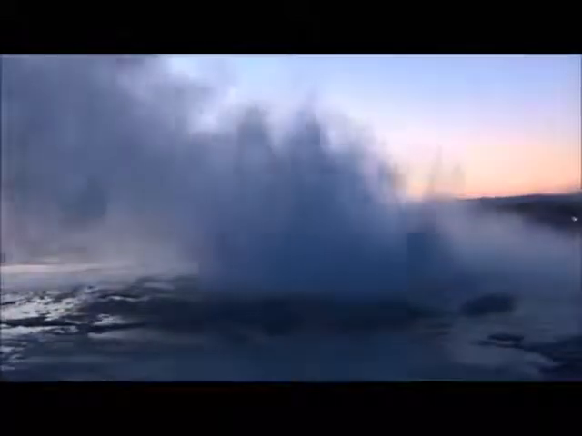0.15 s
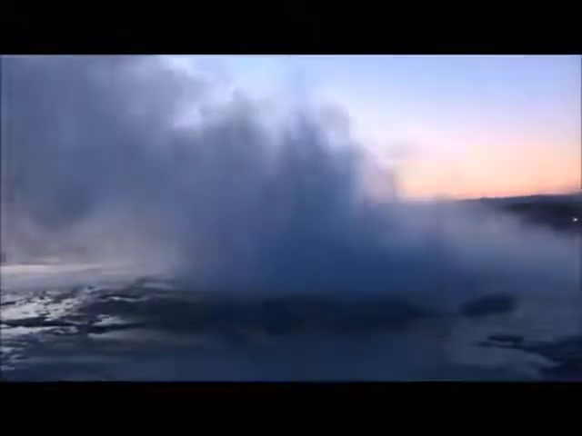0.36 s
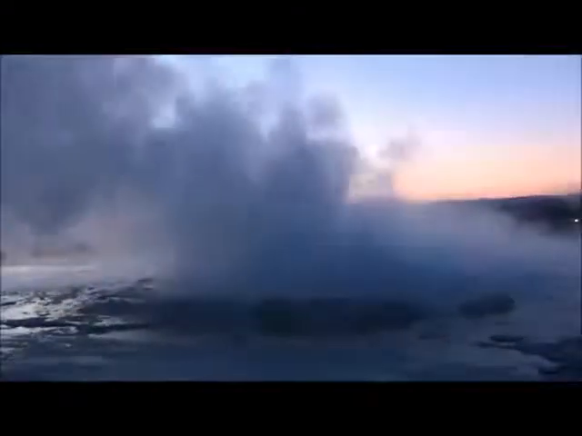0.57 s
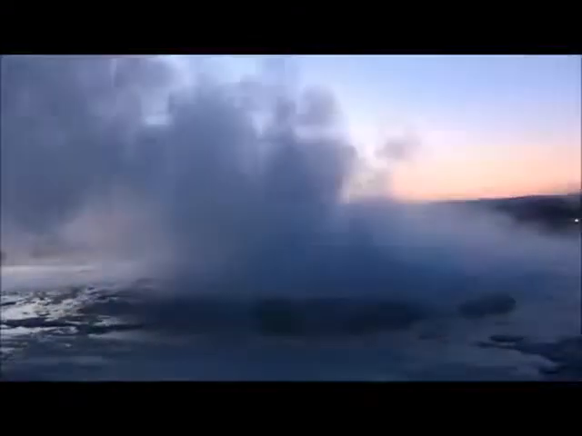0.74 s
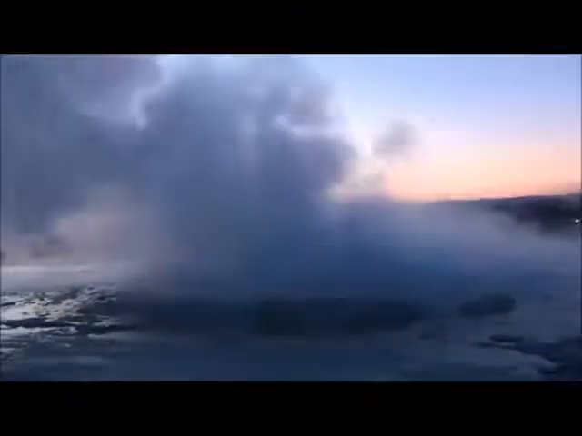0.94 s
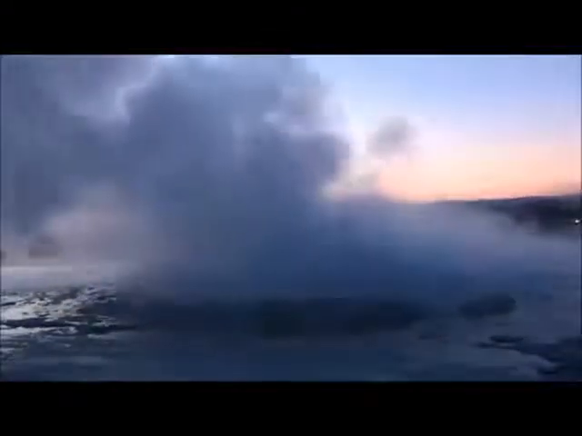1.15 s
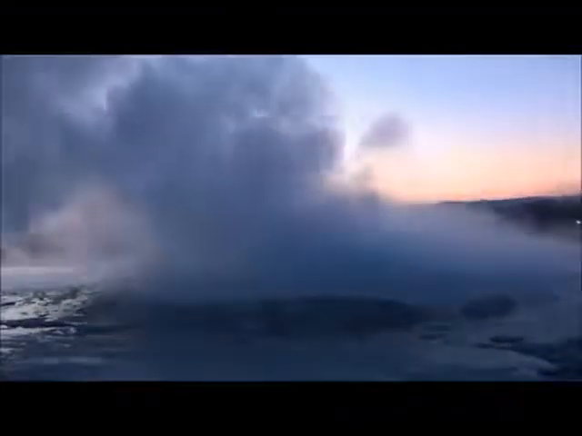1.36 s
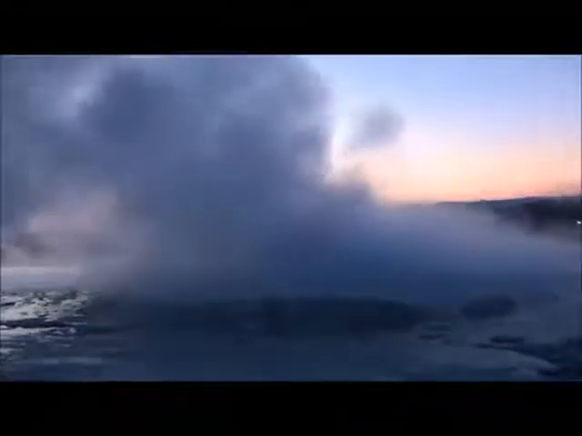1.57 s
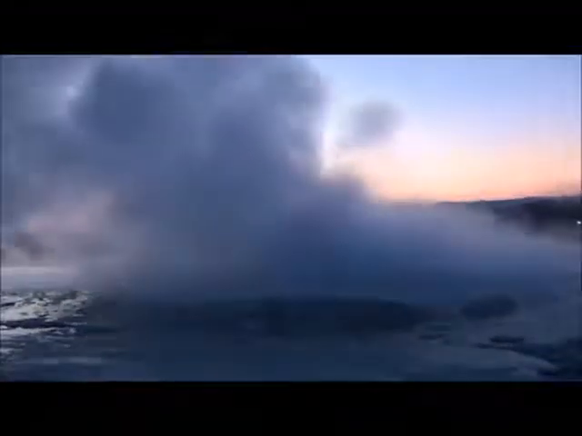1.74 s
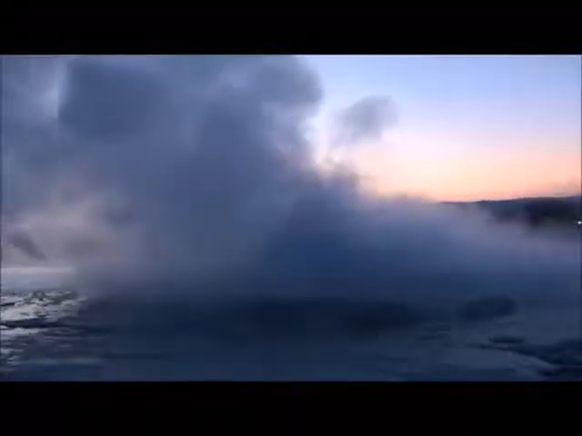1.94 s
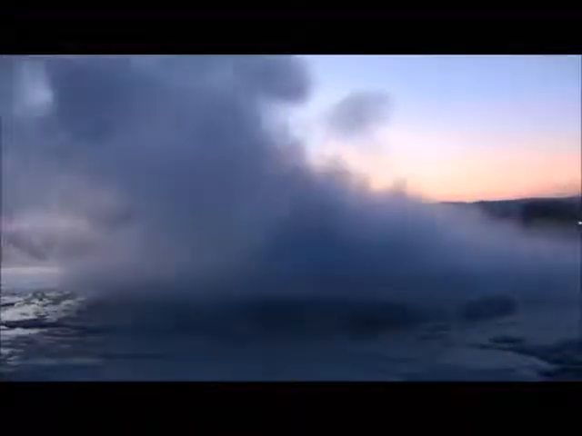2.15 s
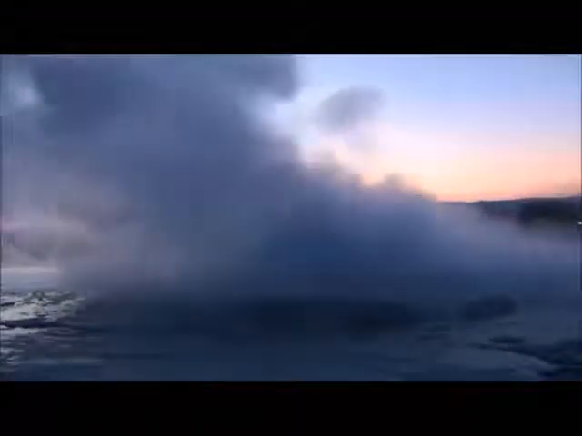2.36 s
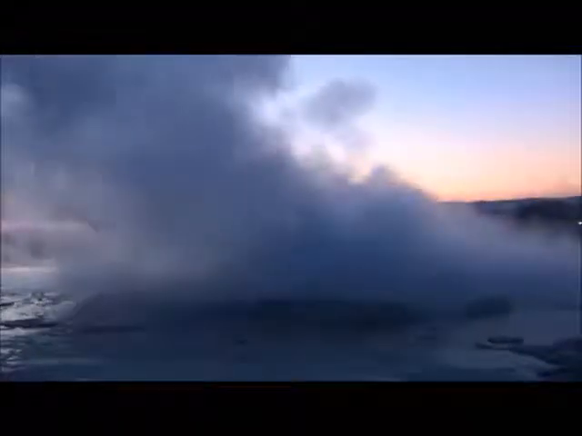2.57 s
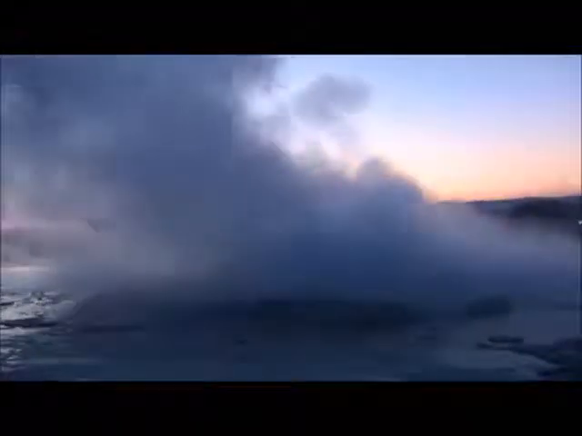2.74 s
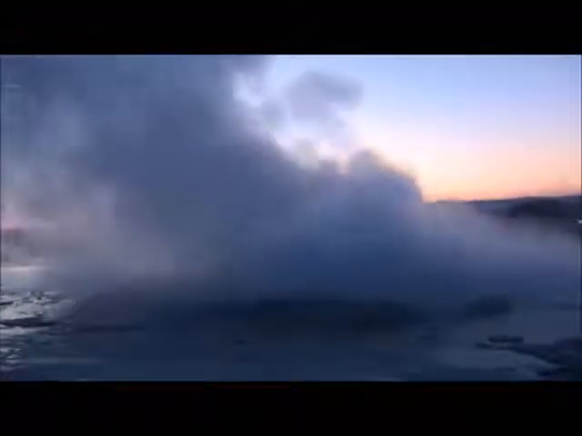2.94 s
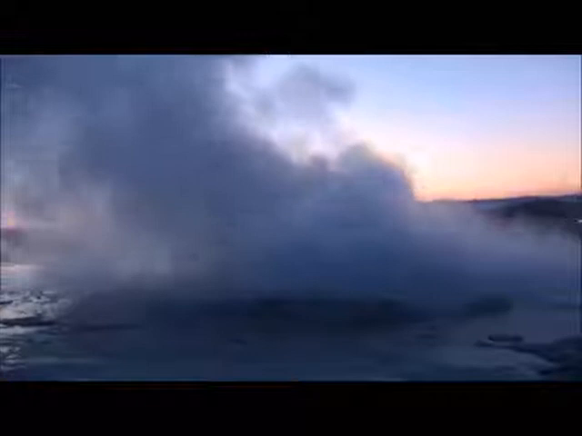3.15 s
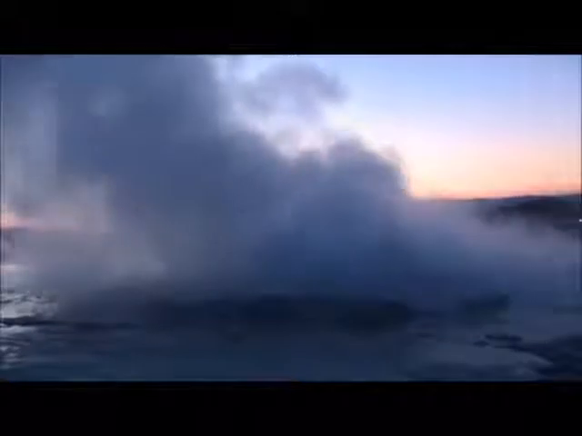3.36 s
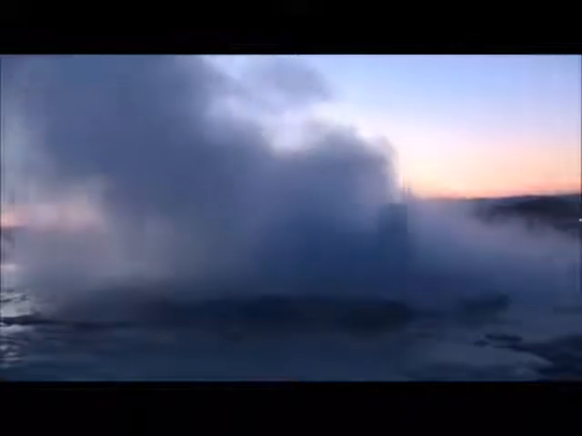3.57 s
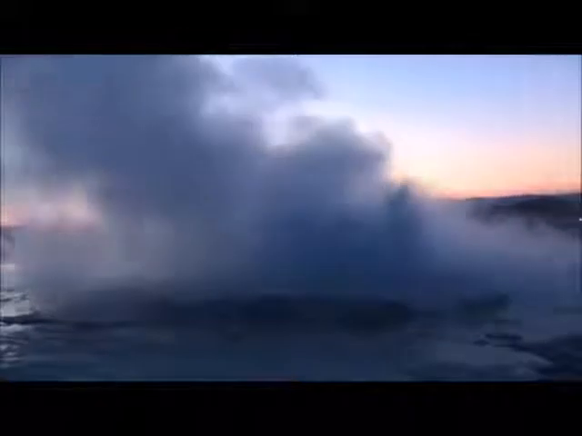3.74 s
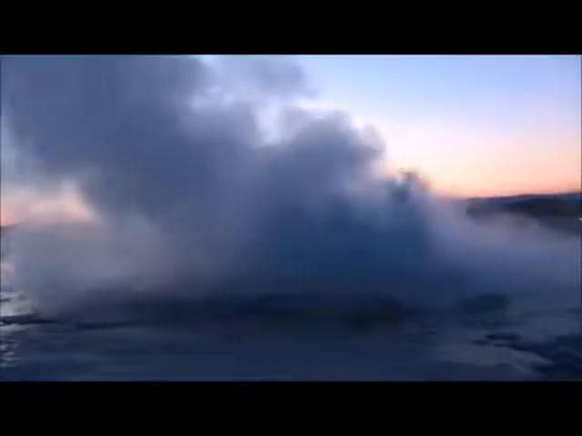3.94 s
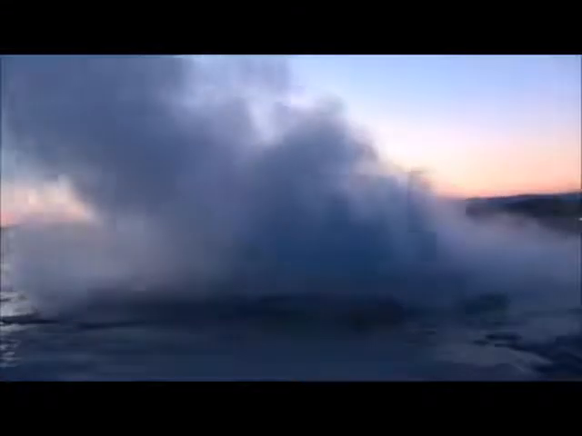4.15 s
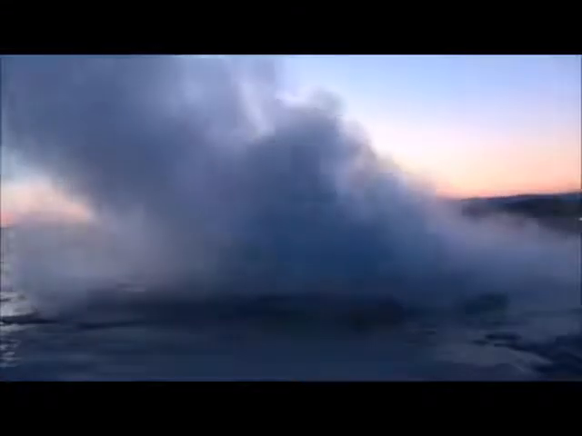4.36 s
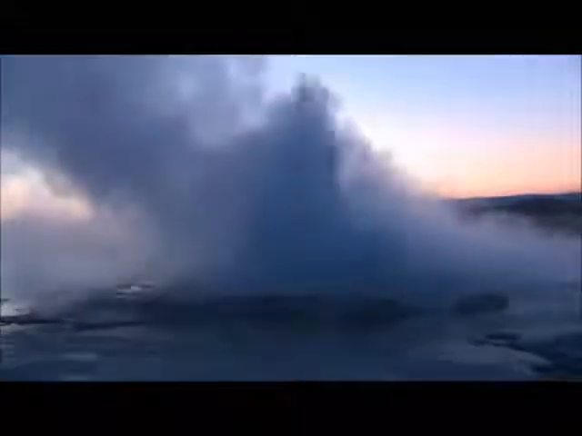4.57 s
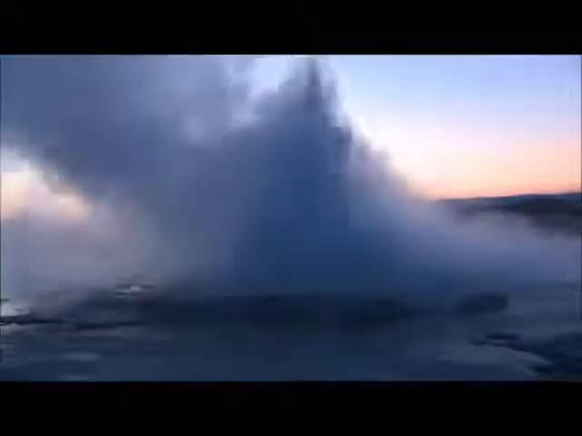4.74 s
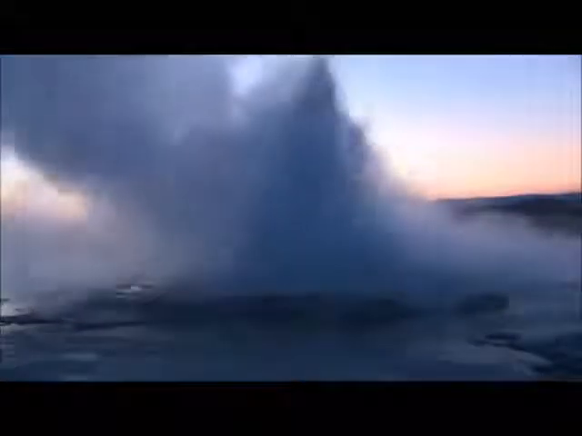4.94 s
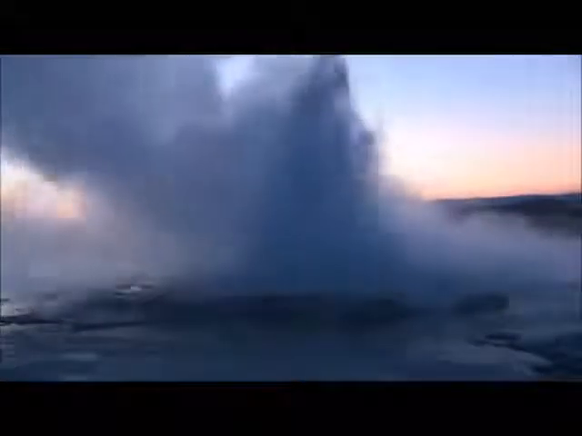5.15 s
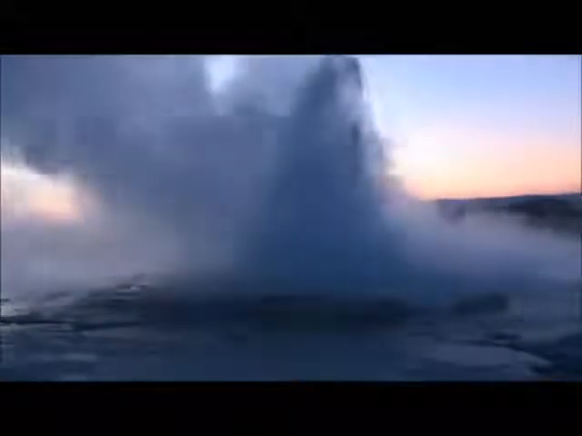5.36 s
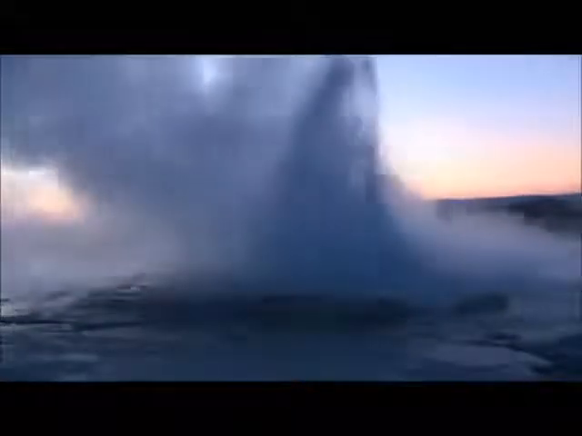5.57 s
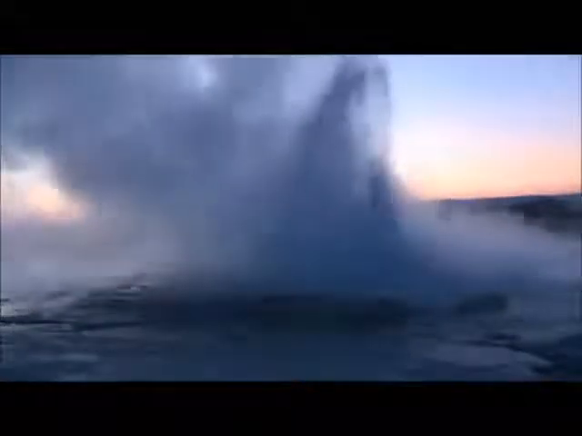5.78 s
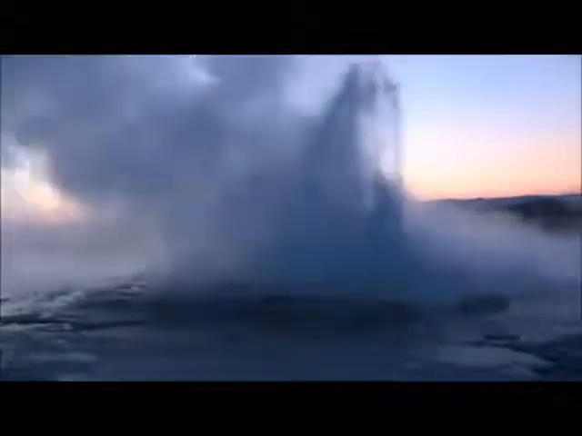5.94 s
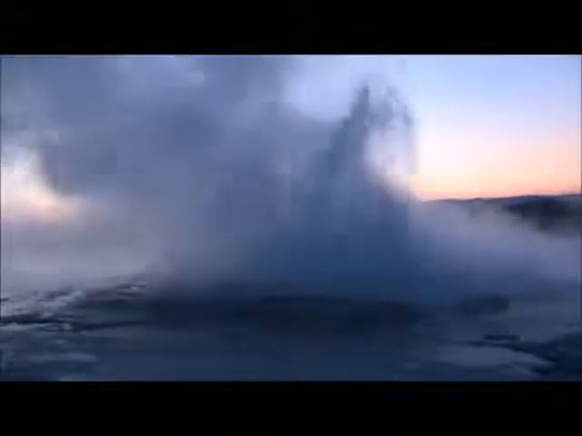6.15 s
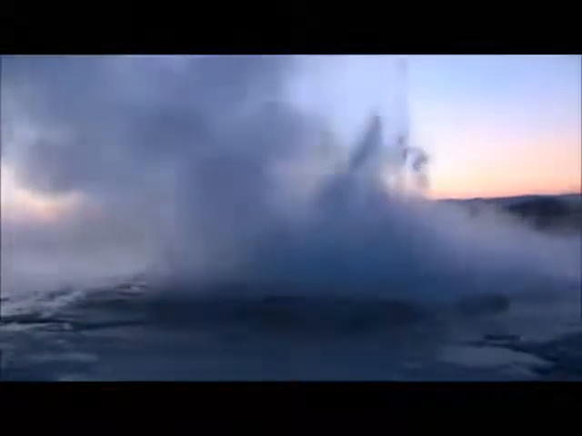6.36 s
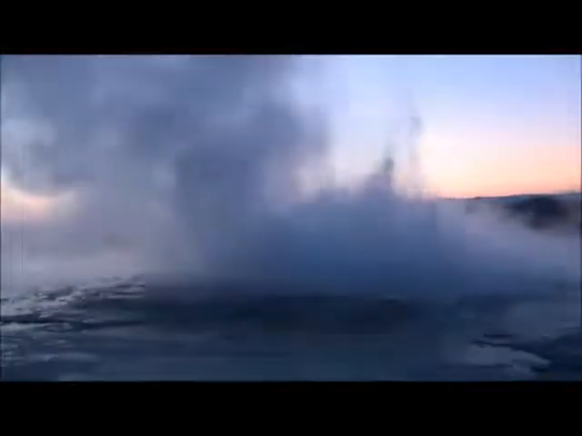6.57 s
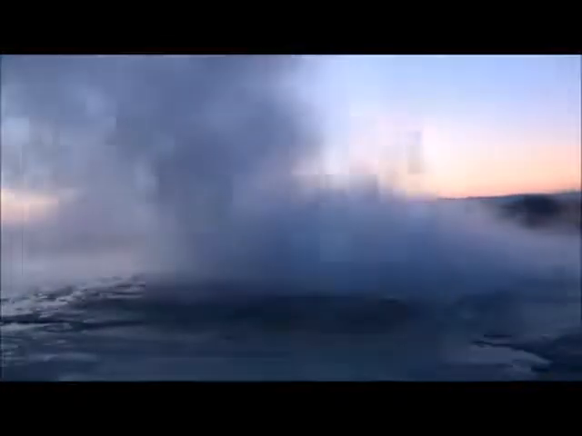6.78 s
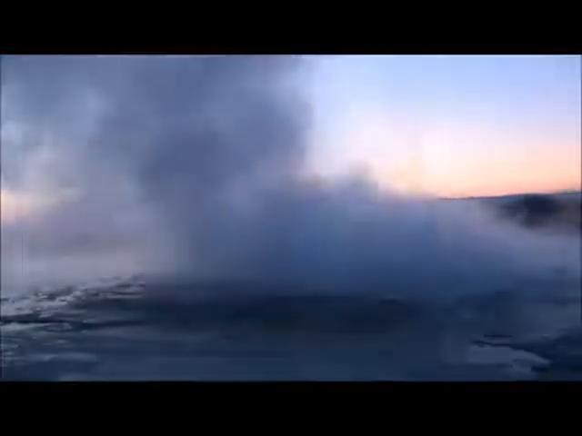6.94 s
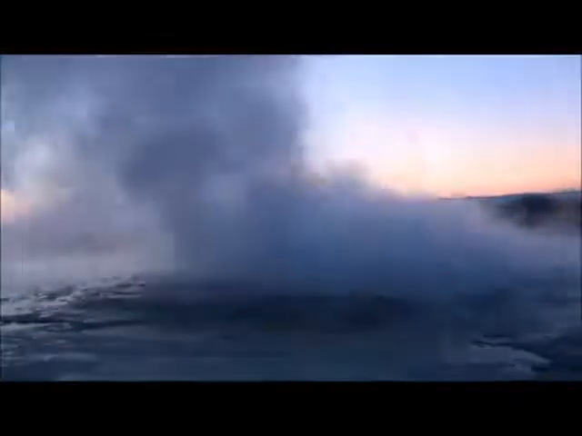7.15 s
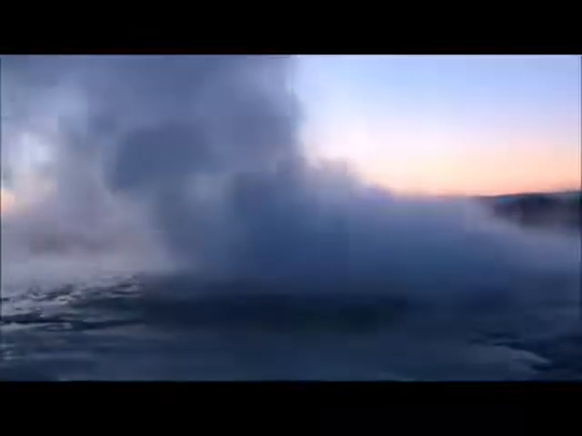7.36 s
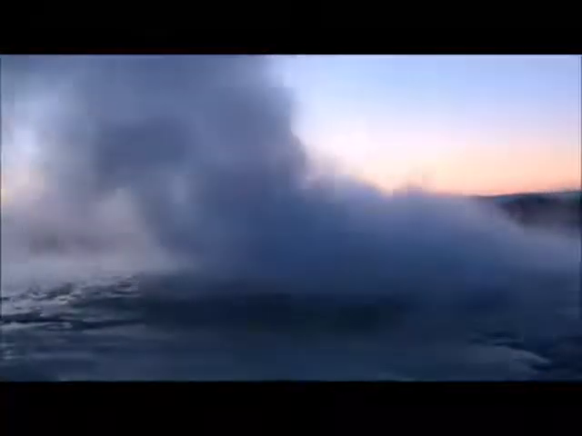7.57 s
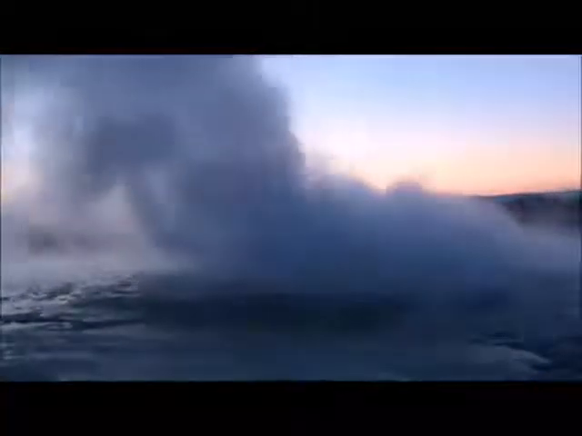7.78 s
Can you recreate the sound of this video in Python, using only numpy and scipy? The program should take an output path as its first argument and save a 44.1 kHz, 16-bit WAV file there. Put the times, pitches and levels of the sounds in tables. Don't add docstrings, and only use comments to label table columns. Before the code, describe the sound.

Broad, noisy water eruption on open wet ground: muffled steam rumble, gurgling slugs of water and countless splats and bubbles under hissing spray. It starts crisp and lively, drops in level after about a second, falls into a dark lull, then returns in uneven heaves, fullest in the second half. A small distant microphone gives an almost central image, with no echo.

```python
import sys
import numpy as np
from scipy import signal
from scipy.io import wavfile
from scipy.ndimage import uniform_filter1d

SR = 44100
rng = np.random.default_rng(int(sys.argv[2]) if len(sys.argv) > 2 else 0)


def undo_db(level):
    steps = np.asarray(level, float) / 20
    return 10 ** steps


def unload_wav(signal):
    wavfile.write(
        sys.argv[1],
        SR,
        np.round(np.clip(np.atleast_2d(signal).T, -1, 1) * 32767).astype(np.int16),
    )


N = 344421


def evened(x):
    return x / np.sqrt(np.mean(x ** 2) + 1e-20)


def smoothed(x, frames, bins):
    return evened(uniform_filter1d(uniform_filter1d(x, size=bins, axis=0), size=frames, axis=1))


def unrest(frames, bins, patchy_db=0.5, gust_db=0.09, flicker_db=0.27):
    a, b = rng.standard_normal((frames, bins, 2)).T
    patches = smoothed(a, 8, 8)
    gusts = smoothed(b, 150, 14)
    flicker = evened(uniform_filter1d(rng.standard_normal(frames), size=3))
    return patchy_db * patches + gust_db * gusts + flicker_db * flicker


def grain(hz, cycles):
    t = np.arange(-150, 151) / SR
    return np.cos(2 * np.pi * hz * t) * np.exp(-.5 * (t * hz / (0.47 * cycles)) ** 2)


def bubble(hz):
    t = np.arange(560) / SR
    ring_s, onset_s = 0.0063, 0.00091
    envelope = np.exp(-t / ring_s) * (1 - np.exp(-t / onset_s))
    return np.sin(2 * np.pi * hz * t * (1 + .5 * t)) * envelope


def shower(shape, per_s, db, spread_db, low_hz, high_hz):
    when, pitch, size, sign = rng.random((round(per_s * N / SR), 4)).T[:, :, None]
    sounds = shape(low_hz + (high_hz - low_hz) * pitch)
    sounds /= np.linalg.norm(sounds, axis=1, keepdims=True)
    sounds *= undo_db(spread_db * np.minimum(-np.log(size), 5)) * np.sign(sign - .5)
    at = (when * N).astype(int) + np.arange(sounds.shape[1])
    return undo_db(db) * evened(np.bincount(at.ravel(), sounds.ravel())[:N])


def splats():
    impacts = shower(lambda hz: grain(hz, 2.14), per_s=2991, db=-10.5, spread_db=2.5, low_hz=594, high_hz=14500)
    bubbles = shower(bubble, per_s=2502, db=-9, spread_db=2, low_hz=600.5, high_hz=14502)
    return impacts + bubbles


# (time [s], peak level [dB], pitch [Hz], length [cycles])
NEAR_DROPS = [(1.2181, -17, 11000, 3), (1.2317, -15, 11000, 2), (1.4239, -14, 5500, 1),
              (1.437, -20, 2200, 2), (1.4755, -19, 6500, 5.4), (1.551, -22, 8000, 1.5),
              (1.6588, -21, 6500, 2), (1.7122, -23, 7500, 3), (1.714, -20, 11500, 2),
              (1.7302, -24, 2600, 2.5), (1.7304, -24, 5000, 3), (5.8515, -13.5, 2120, 3)]


def drops():
    out = np.zeros(N)
    for s, db, hz, cycles in NEAR_DROPS:
        at = round(s * SR) - 150
        out[at:at + 301] += undo_db(db) * grain(hz, cycles)
    return out


# (frequency [Hz], level [dB per Hz])
LOW_RESPONSE = [(15, -60), (25, -41), (59, -22.5), (161, -6), (226, -4), (308, -3), (392, -11), (461, -3),
                (551, 1), (692, -1), (827, -5), (1050, -1), (1200, -3), (1560, -34), (2640, -120)]
# (frequency [Hz], level [dB per Hz])
HIGH_RESPONSE = [(1200, -5.5), (1330, -4.5), (1600, -1.4), (1950, -4.5), (2230, -4), (2500, -6), (3150, -7),
                 (3600, -9), (4470, -10.5), (5800, -8), (7000, -9.5), (9000, -11.5), (11600, -15),
                 (15000, -25.5)]


def colour(hz, octave):
    low_hz, low_db = np.transpose(LOW_RESPONSE[:-2])
    high_hz, high_db = np.transpose(HIGH_RESPONSE)
    low = np.interp(octave, np.log2(low_hz + 1), low_db)
    high = np.interp(octave, np.log2(high_hz + 1), high_db)
    joint = np.searchsorted(hz, high_hz[0])
    return np.r_[low[:joint], high[joint:] + low[joint] - high[joint]]


# (time [s], centre frequency [Hz], level [dB], duration [s])
WATER_SLUGS = [(0.59, 498, 6, 0.056), (1.47, 1350, -2, .15), (3.05, 1130, 3.5, 0.11),
               (3.46, 1000, -5, 0.079), (3.43, 550, 3, 0.061), (4.07, 510, -5, 0.065),
               (4.35, 1600, 2.5, 0.097), (4.78, 710, 3, 0.093), (5.68, 490, -7, 0.13),
               (5.86, 1430, -3.5, .06), (5.97, 780, -2.5, 0.09), (2.55, 610, -2, .1),
               (6.27, 750, 1.5, 0.07), (0.57, 850, -0.5, .08), (6.34, 960, 9, 0.02), (6.45, 520, 6, 0.05),
               (0.45, 930, 3, .05), (1.6, 600, -6.5, .06), (2.8, 1700, 0, .1), (3.2, 1600, 3, 0.087),
               (4.04, 2700, -2.5, 0.037), (3.9, 2500, 4, .05), (6.5, 660, 2, 0.068), (6.75, 2800, 1.5, .05),
               (7.0, 1600, 1, 0.037), (7.0, 950, -3.5, .06), (3.25, 560, -4, .1), (4.65, 540, -2.5, 0.088),
               (7.4, 560, -2, .1), (3.7, 1050, -2, .06)]


def slugs(octave, t):
    total_db = 0
    for s, hz, db, lasting_s in WATER_SLUGS:
        band = np.exp(-.5 * ((octave - np.log2(hz)) / 0.17) ** 2)
        moment = np.exp(-.5 * ((t - s) / lasting_s) ** 2)
        total_db = total_db + db * np.outer(band, moment)
    return total_db


def bumps(rows, lasting_s):
    coarse = np.arange(0, N, 100) / SR
    db = sum(size_db * np.exp(-.5 * ((coarse - s) / lasting_s) ** 2) for s, size_db in rows)
    return np.interp(np.arange(N) / SR, coarse, db)


# (time [s], falling water [dB], fineness of spray [dB], vent boiling over falling water [dB])
SURGES = [(0.0, -23, -0.5, 3), (.3, -24.5, 1.5, 3), (.62, -24, 2, -2), (.87, -28, 2.5, 1.5),
          (1.15, -26, 1.5, -1), (1.4, -25.5, 3.5, -5.5), (1.77, -33, -1.5, 2), (2.2, -32.5, -5, -0.5),
          (2.45, -31, -3, 0), (2.98, -23, -2, -4.5), (3.55, -29, -4, 2), (3.92, -28.5, -4, 1),
          (4.5, -21, -2, -0.5), (5.4, -22, -1.5, 0), (6.45, -19.5, -1, -1), (7.05, -20, 0, 5),
          (7.2, -21.5, -3, 2), (7.81, -24.5, -3, 2)]
# (time [s], level [dB])
COLUMN_HEAVES = [(.08, -2), (.25, 1), (.8, -1), (1.04, 2.5), (1.27, -0.5), (1.92, 1), (2.06, 0), (3.12, -1),
                 (4.02, 3), (4.17, 2), (4.6, 1), (4.75, 1.5), (4.85, -1), (5.0, 4.5), (5.22, 3.5),
                 (5.42, -2), (5.72, -0.5), (5.98, -0.5), (6.1, 0), (.56, 1.5), (3.8, -1), (6.44, 3.5),
                 (6.58, -0.5), (6.73, 2), (6.84, -6), (7.02, -1.5), (7.17, -4), (7.43, 2.5), (7.72, -1.5)]


def layer_db(db, falling, fine, boiling, heaving):
    t = np.arange(N) / SR
    s, water_db, fine_db, boil_db = np.transpose(SURGES)
    mean_db = -24
    level_db = db + falling * (water_db - mean_db) + fine * fine_db + boiling * boil_db
    gain_step_db = -4.5 * (t > 1.2195)
    return np.interp(t, s, level_db) + heaving * bumps(COLUMN_HEAVES, 0.054) + gain_step_db


def spray_tilt(octave, hz, t):
    s, _, fine_db, _ = np.transpose(SURGES)
    db_per_octave = 0.54 + 0.53 * np.interp(t, s, fine_db)
    octaves = np.clip(octave - np.log2(7000), -.8, 2) / (1 + (3700 / (hz + 1)) ** 12)
    return np.outer(octaves, db_per_octave)


CROSSOVERS = (386, 1220, 3820)
# (level [dB], then shares of falling water, fineness, boiling and heaves [ratio])
LAYER_SHARES = [
    (-38, 1.03, -0.34, 0.83, 0.52),
    (-30, 1.12, -0.15, 0.7, 0.77),
    (-27.5, 1.01, 0.062, .01, 0.32),
    (-27, 0.99, 1.04, .01, .2),
]
# (time [s], level [dB])
STEAM_BOOMS = [(.13, -3.5), (.5, 3), (1.6, -2), (1.92, 3), (2.1, -2), (2.85, 1.5), (3.02, 3), (3.48, 5),
               (3.9, 2), (4.08, -3), (4.5, -1), (4.6, -4), (5.22, 0.5), (5.45, 2.5), (6.0, 0), (6.28, 3.5),
               (6.47, 4), (6.75, -3.5), (7.05, 1), (7.38, -3)]


def geyser():
    rush = rng.standard_normal(N) + splats()
    hz, t, z = signal.stft(evened(rush), SR, nperseg=1024, noverlap=768)
    octave = np.log2(hz + 1)
    spectrum_db = colour(hz, octave)[:, None] + spray_tilt(octave, hz, t) + slugs(octave, t)
    z = z * undo_db(spectrum_db + unrest(len(t), len(hz)))
    above = [1 / (1 + np.exp(-(octave - np.log2(c)) / 0.16)) for c in CROSSOVERS]
    shares = -np.diff([np.ones(len(hz)), *above, np.zeros(len(hz))], axis=0)
    levels = [layer_db(*row) for row in LAYER_SHARES]
    levels[0] = levels[0] + bumps(STEAM_BOOMS, 0.049)
    out = np.zeros(N)
    for share, level_db in zip(shares, levels):
        layer = signal.istft(z * share[:, None], SR, nperseg=1024, noverlap=768)[1][:N]
        out += evened(layer) * undo_db(level_db)
    return out


def scene():
    return np.tile(geyser() + drops(), (2, 1))


def block_cosines(s, from_hz, to_hz):
    grid = 856
    at = grid + 1024 * (round((s * SR - grid) / 1024) - 1)
    lines = np.arange(round(from_hz * 2048 / SR), round(to_hz * 2048 / SR)) + .5
    window = signal.windows.cosine(2048)[:, None]
    phase = np.pi / 1024 * np.outer(np.arange(2048) + 512.5, lines)
    return slice(at, at + 2048), window * np.cos(phase) / np.sqrt(512)


NOISE_MOMENTS = [.228, .344, .762, 2.016, 2.04, 2.179, 2.388, 2.411, 2.458, 2.62, 2.643, 2.945, 3.827, 3.92,
                 4.269, 4.756, 4.988, 5.058, 5.081, 5.314, 5.499, 5.755, 6.057, 6.707, 6.823]


def noise_filled(x):
    out = x.copy()
    low_hz, high_hz, width_hz, second_chance = 4220, 13400, 1500, .6
    for s, (first, apart, luck) in zip(NOISE_MOMENTS, rng.random((len(NOISE_MOMENTS), 3))):
        places = [first]
        if luck < second_chance:
            places.append((first + .3 + .4 * apart) % 1)
        for place in places:
            hz = low_hz * (high_hz / low_hz) ** place
            block, lines = block_cosines(s, hz, hz + width_hz)
            old = x[:, block] @ lines
            noise = rng.standard_normal(old.shape) * np.sqrt(np.mean(old ** 2))
            out[:, block] += (noise - old) @ lines.T
    return out


# (lowest [Hz], highest [Hz], rate [per s], level [dB])
SIDE_TRACES = [(40, 200, 9, -16.5), (2240, 2850, 12, -8)]


def side_traces(x):
    out = np.zeros_like(x)
    span_s = 7.6
    for from_hz, to_hz, per_s, db in SIDE_TRACES:
        for place_s, place_hz, sign in rng.random((round(per_s * span_s), 3)):
            hz = from_hz + place_hz * (to_hz - from_hz)
            block, lines = block_cosines(.1 + span_s * place_s, hz - 50, hz + 50)
            nearby = np.sqrt(np.mean((x[0, block] @ lines) ** 2))
            size = undo_db(db) * nearby * np.sign(sign - .5)
            out[:, block] += np.outer([size, -size], lines[:, 2])
    return out


def roll_off(x):
    return signal.sosfilt(signal.butter(12, 15030, fs=SR, output="sos"), x)


def record(dry):
    mix = noise_filled(dry) + side_traces(dry)
    return roll_off(mix)


dry = scene()
out = record(dry)
unload_wav(out)
```